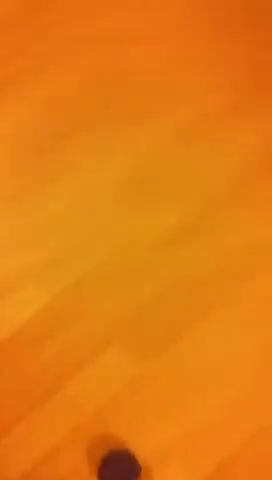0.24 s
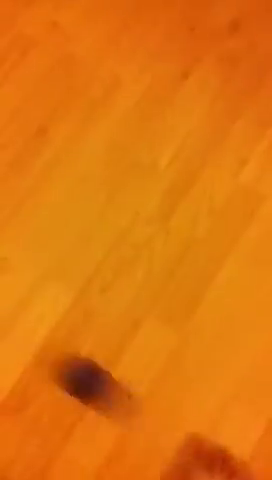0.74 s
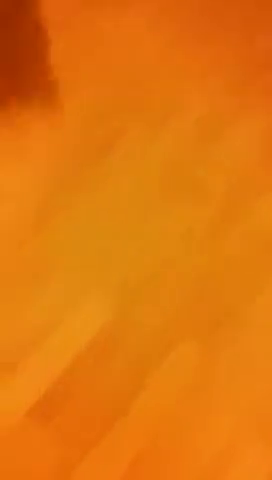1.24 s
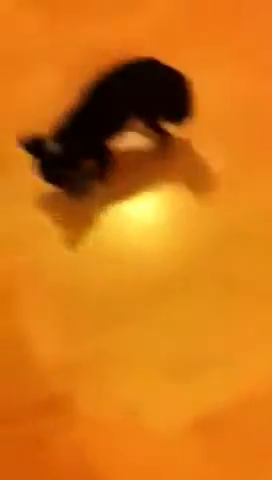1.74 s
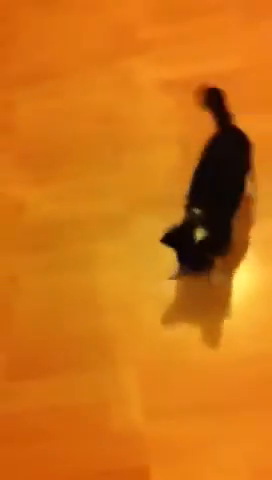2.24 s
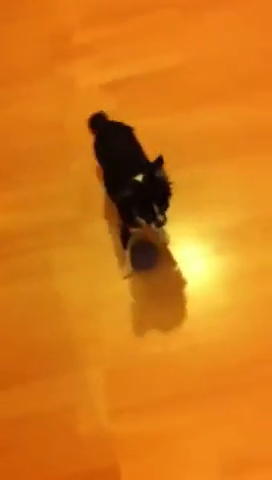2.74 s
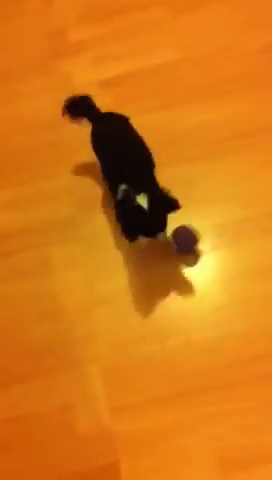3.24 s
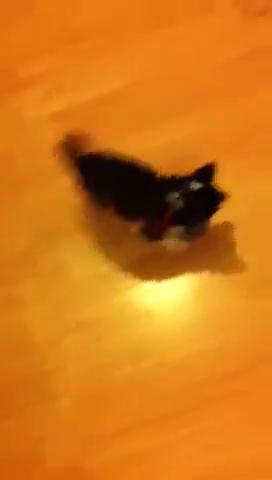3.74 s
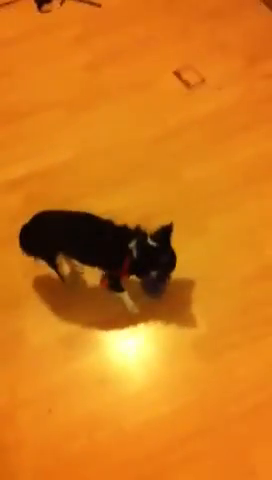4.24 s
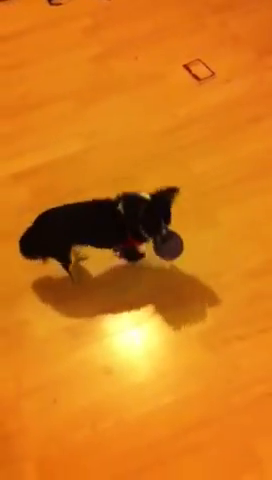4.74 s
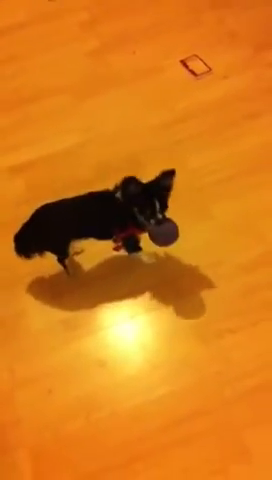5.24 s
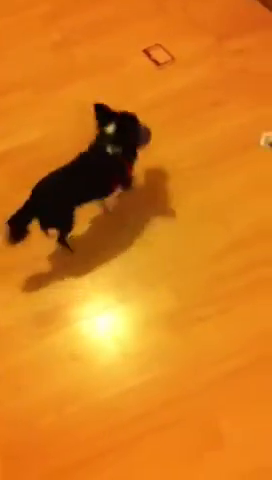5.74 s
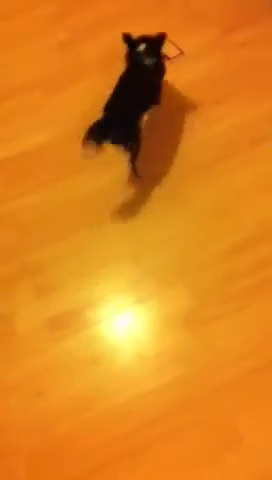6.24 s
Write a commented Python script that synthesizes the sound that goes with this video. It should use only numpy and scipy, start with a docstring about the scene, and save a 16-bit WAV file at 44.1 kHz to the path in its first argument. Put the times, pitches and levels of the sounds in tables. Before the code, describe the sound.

Cloth zips, a toy chirps briefly, then claws clatter on floorboards with two loud squeaky bites and tiny tag tinkles in a room.

```python
"""A small dog with a squeaky rubber ball on a wooden floor; hum, hiss and a faint burble lie behind it all.
First a trouser leg zips, rib against rib, ahead of a light kick; the boards thump and the reed squeaks briefly.
From about 1 s claws tick and skid, blows ring the boards and the collar tag tinkles; bites at 1.8 s and 3.6 s
make the reed squeak with the jaw's pressure. Sparse claws follow, then one dry click close to the microphone,
more light steps and two last tinkles. Toy, dog and leg are heard in a briefly ringing room."""
import sys
import numpy as np
from scipy import signal
from scipy.fft import rfft, irfft, next_fast_len
from scipy.io import wavfile

SR = 44100
rng = np.random.default_rng(int(sys.argv[2]) if len(sys.argv) > 2 else 0)


def master_out(mix):
    """Clip the mix to full scale and print it as 16-bit PCM to the path in sys.argv[1]."""
    frames = np.transpose(np.atleast_2d(mix))
    ceiling = np.clip(frames, -1, 1)
    pcm = np.round(ceiling * 32767).astype(np.int16)
    wavfile.write(sys.argv[1], SR, pcm)


N = 286958
TIME = np.arange(N) / SR

# Room: decay time per band: pitch_hz, t60_s
ROOM_DECAY = [(200, 0.81), (800, 0.29), (2000, 0.41), (6000, 0.36), (10000, 0.34), (15000, 0.28)]
# Near reflections from floor, walls and ceiling: delay_s, gain (before each source's own share)
REFLECTIONS = [(.0023, 0.082), (.0061, 0.12), (0.0094, .35), (0.0144, 0.05)]
# Background hiss, relative colour: pitch_hz, level_db
HISS_COLOUR = [(25, -50), (45, -2.5), (70, -10.5), (150, 15), (300, 8), (600, -0.5), (1300, -4),
               (2500, -6.5), (5000, -7.5), (10000, -11.5), (15500, -12)]
# Steady motor lines of the appliance: pitch_hz, level_db (rms, about which it wavers)
MOTOR_LINES = [(150, -63.5), (200, -64.5)]
# Low resonances of the appliance's rumble: pitch_hz, width_hz, level_db (rms)
RUMBLE_BANDS = [(107.1, 4.3, -75.5), (150.2, 7.4, -75), (166.7, 8.4, -65), (241.8, 36, -66.5),
                (289.6, 40, -74.5), (371, 62, -77.5), (495.7, 42, -80)]
# Click close to the microphone, relative colour: pitch_hz, level_db
CLICK_COLOUR = [(300, -29), (2500, -24), (3800, -1), (7000, -14), (10000, -18), (15500, -15)]
# Leg movement: time_s, ribs_per_s, level_db
LEG_SWISH = [(0.081, 740, -90), (0.15, 670, -80), (0.22, 610, -67.5), (0.31, 680, -59), (0.37, 816, -68.5),
             (0.432, 820, -61), (0.50, 760, -68.5), (0.57, 1740, -76)]
# What the cloth gives off, relative colour: pitch_hz, level_db
CLOTH_COLOUR = [(500, -20), (820, 4.5), (1350, 5.5), (2100, 4), (2700, -6), (4000, -17), (7000, 4)]
# Jolts of the collar tag: start_s, level_db
TAG_JOLTS = [(1.55, -47.5), (1.631, -41), (6.069, -47), (6.449, -41.5)]
# Ringing modes of the tag: pitch_hz, level_db (relative to the touch), t60_s
TAG_MODES = [(6650, -47, 0.27), (8170, -23.5, 0.5), (10300, -10.5, 0.16), (14690, -17, .08),
             (14740, 9, 0.068)]
# Blows of paws and ball on the boards: start_s, level_db, knock_hz
FLOOR_BLOWS = [(0.495, -43.5, 837), (0.712, -41, 870), (0.863, -45, 810), (1.230, -42.5, 452),
               (1.335, -46, 507), (1.488, -33.5, 450), (1.585, -32, 438), (1.658, -46, 480),
               (2.293, -39, 700), (2.308, -38, 760), (2.614, -60, 690), (3.333, -46.5, 437),
               (3.529, -40, 636), (3.667, -45, 690)]
# Ringing modes of the boards: pitch_hz, level_db (relative to the blow), t60_s
BOARD_MODES = [(245, 4.5, 0.14), (360, -8, 0.046), (422, -6, 0.042), (506, 2, 0.013), (566, -7, 0.074),
               (738, -3.5, 0.021), (887, -3.5, 0.028), (1022, -17, 0.083), (1555, 8.5, 0.0084)]
# Single claws on the boards: start_s, level_db, treble_tilt_db_per_octave, scrape_share
CLAW_TICKS = [(1.065, -34.5, 2, 0), (1.228, -25, 4.5, 0), (1.309, -34, 12, .1), (1.344, -28.5, 1.5, 0),
              (1.489, -26, 2.5, 0), (1.525, -29, 3.5, 0.12), (1.659, -31, 1.5, 0.63), (1.726, -44, 7, 0.86),
              (2.291, -36, 1.5, 0.45), (2.311, -38.5, 1.5, 0.65), (2.443, -42, 2, 0.28),
              (2.617, -40.5, 2, 0.63), (2.639, -39, 3, 0.53), (3.328, -39.5, 2, 0.72),
              (3.531, -46.5, -1, .95), (3.939, -50.5, 3, 0.86), (4.928, -52.5, 0, 0.62),
              (5.693, -56.5, 2.5, 0.76), (6.410, -49, 0, 0.13)]
# Colour common to all claws, relative, before the tilt: pitch_hz, level_db
CLAW_SPECTRUM = [(80, -78), (500, 14.5), (1000, -3.5), (1700, -7), (2800, -10), (4300, 1), (7000, -3),
                 (10000, -4), (15500, -9.5)]
# Stretches of trotting with light steps: start_s, end_s, level_db (middle of the spread)
TROT_SPANS = [(0.874, 1.2, -56.5), (1.429, 1.72, -49), (5.833, 6.5, -59.5)]
# What the squeaker's tube lets out: pitch_hz, level_db (relative)
TUBE_RESPONSE = [(1100, -1.5), (2250, -11), (3400, -9.5), (4500, -8.5), (5600, -4), (6100, -3), (6650, 1.5),
                 (7250, -4), (7900, -8), (9000, -12), (11200, -20.5), (13500, -31.5), (16000, -37)]
# Squeezes of the ball, a light kick then two bites: start_s, length_s, release_s, held_pitch_hz,
# snap_s (peak of the first snap after the start), snap_rise_hz, push_s (peak of the second push
# after the start), push_width_s, held_level_db, brightness_db, held_roughness
BALL_SQUEEZES = [(0.703, 0.057, 0.051, 1039, 0.007, 54.5, 0.006, 0.0091, -48.5, -8, 1.08),
                 (1.753, 0.34, 0.046, 1107, .03, 106.6, .25, 0.092, -30, 0, 0.14),
                 (3.611, .25, .066, 1082, .023, 131.7, .172, 0.0267, -29.5, -4, 0)]

HISS_RMS_DB = -64
BLIPS_PER_S, BLIP_T60_S, BLIP_SPREAD_DB = 6.9, 0.038, -0.5
CLICK_START_S, CLICK_LEVEL_DB = 5.779, -38
TAG_SWING_S, TAG_SWING_LOSS_DB = 0.035, 10   # mean wait and loss from touch to touch
TAG_CLICK_DB, TAG_CLICK_DECAY_S, TAG_CLICK_LOW_CUT_HZ = -3, 0.0063, 6000
STEPS_PER_S, STEP_SPREAD_DB, STEP_TILT_DB_PER_OCTAVE, STEP_SCRAPE_SHARE = 8, 6.5, 0.5, 0.4
SNAP_WIDTH_S, PUSH_RISE_HZ, RELEASE_DROOP_HZ = 0.037, 29.04, 55
EDGE_S, RELEASE_FADE_DB, RELEASE_BRIGHT_DB = 0.004, 14.5, 9
LOUDER_DB_PER_HZ, BRIGHTER_DB_PER_HZ = 0.04, 0.0057   # per Hz of pitch rise
SAG_S, SAG_WIDTH_S = 0.054, 0.078   # the reed flaps raggedly while the first snap sags
SAG_ROUGHNESS, RELEASE_ROUGHNESS = 0.48, 0.81   # added to the held roughness
WEAK_BLOW_DB = -53
TOP_CUTOFF_HZ = 16000


def from_db(db):
    """Turn decibels into a gain."""
    return 10 ** (np.asarray(db) / 20)


def rms_one(x):
    """Scale a sound to an rms of 1."""
    return x / np.sqrt(np.mean(x ** 2) + 1e-20)


def at_hz(points, hz):
    """Read a table on a log-frequency axis."""
    freqs, values = np.transpose(points)
    return np.interp(np.log(np.maximum(hz, 1)), np.log(freqs), values)


def add(out, start_s, sound):
    """Mix a short sound in at its start."""
    at = int(start_s * SR)
    out[at:at + len(sound)] += sound[:N - at]


def drift(points_per_s):
    """Straight lines between random points of spread 1: an unsteady hand."""
    points = rng.standard_normal(N // 8)
    return np.interp(TIME * points_per_s, np.arange(len(points)), points)


def swell(t, centre_s, width_s):
    """A smooth rise and fall of height 1."""
    return np.exp(-((t - centre_s) / width_s) ** 2)


def filtered(x, hz, kind):
    """Second-order Butterworth filter: "low", "high" or "band"."""
    return signal.sosfilt(signal.butter(2, hz, kind, fs=SR, output="sos"), x)


def coloured(x, spectrum):
    """Give a noise the spectrum of a table."""
    size = next_fast_len(len(x))
    gains = from_db(at_hz(spectrum, np.fft.rfftfreq(size, 1 / SR)))
    return irfft(rfft(x, size) * gains, size)[:len(x)]


def ring(x, hz, t60):
    """A two-pole resonance: a unit click sets a sine of height 1 ringing, which dies by 60 dB in t60."""
    radius = np.exp(-np.log(1000) / (t60 * SR))
    turn = 2 * np.pi * hz / SR
    return signal.lfilter([0, np.sin(turn)], [1, -2 * radius * np.cos(turn), radius ** 2], x + 1e-18)


def room_tail(build_s):
    """Diffuse echoes that build up and then die band by band; unit energy."""
    t = TIME[:SR * 3 // 4]
    white = rfft(rng.standard_normal(len(t)))
    hz = np.fft.rfftfreq(len(t), 1 / SR)
    edges = np.geomspace(60, SR / 2, 12)
    tail = np.zeros(len(t))
    for low, high in zip(edges, edges[1:]):
        band = irfft(white * (hz >= low) * (hz < high), len(t))
        t60 = at_hz(ROOM_DECAY, np.sqrt(low * high))
        tail += band * np.exp(-np.log(1000) * t / t60)
    tail *= 1 - np.exp(-t / build_s)
    return tail / np.linalg.norm(tail)


def room(x, wet_db, early):
    """Direct sound, a few near reflections and the tail, together of unit energy."""
    response = from_db(wet_db) * room_tail(build_s=0.0009)
    response[0] += 1
    for delay_s, gain in REFLECTIONS:
        response[int(delay_s * SR)] += early * gain
    return signal.fftconvolve(x, response / np.linalg.norm(response))[:N]


def hiss():
    """Steady coloured noise behind everything."""
    return from_db(HISS_RMS_DB) * rms_one(coloured(rng.standard_normal(N), HISS_COLOUR))


def appliance(waver_db):
    """An appliance hums: wavering motor lines and a rumble that gathers in low resonances."""
    out = np.zeros(N)
    for hz, level_db in MOTOR_LINES:
        height = np.sqrt(2) * from_db(level_db + waver_db * drift(4.2))
        out += height * np.sin(2 * np.pi * (hz * TIME + rng.random()))
    for hz, width_hz, level_db in RUMBLE_BANDS:
        noise = rng.standard_normal(N + SR)
        band = filtered(noise, [hz - width_hz / 2, hz + width_hz / 2], "band")
        out += from_db(level_db) * rms_one(band[SR:])   # skip the filter's first second
    return out


def burble(low_hz, high_hz, level_db):
    """Soft, hollow blips of changing pitch: uneven clicks excite resonances in random proportions."""
    sizes = np.zeros(N)
    for k, (late, strength) in enumerate(rng.standard_normal((100, 2))):
        at = int(abs(k + 0.25 * late) / BLIPS_PER_S * SR)
        sizes[at:at + 1] = from_db(BLIP_SPREAD_DB * strength)
    blips = np.zeros(N)
    for hz in np.geomspace(low_hz, high_hz, 9):
        blips += ring(sizes * rng.standard_normal(N), hz, BLIP_T60_S)
    blips = filtered(blips, [low_hz, high_hz], "band")
    return from_db(level_db) * rms_one(room(blips, wet_db=7.5, early=1.0))


def near_click(decay_s):
    """One small dry click close to the microphone: a burst of noise that dies at once."""
    out, t = np.zeros(N), TIME[:SR // 50]
    burst = rms_one(coloured(rng.standard_normal(len(t)), CLICK_COLOUR))
    add(out, CLICK_START_S, from_db(CLICK_LEVEL_DB) * burst * np.exp(-t / decay_s))
    return out


def swish(slip):
    """Ribbed cloth rubs on cloth: an unsteady zip whose pitch follows the speed of the leg."""
    time_s, ribs_per_s, level_db = np.transpose(LEG_SWISH)
    rate = np.interp(TIME, time_s, ribs_per_s)
    phase = 2 * np.pi * np.cumsum(rate * (1 + slip * drift(900))) / SR
    zipping = np.zeros(N)
    for order in range(1, 8):
        gain = from_db(at_hz(CLOTH_COLOUR, order * rate))
        zipping += gain * drift(129.7) * np.sin(order * phase)
    moving = (TIME > time_s[0]) * (TIME < time_s[-1])
    return from_db(np.interp(TIME, time_s, level_db)) * moving * zipping


def collar_tag():
    """Each jolt makes a small metal disc touch, swing back and touch twice more; it clicks and rings very high."""
    touches = np.zeros(N)
    for start_s, level_db in TAG_JOLTS:
        for k, uneven in enumerate(rng.uniform(0.8, 1.2, 3)):
            at = int((start_s + k * TAG_SWING_S * uneven) * SR)
            touches[at:at + 1] = from_db(level_db - k * TAG_SWING_LOSS_DB)
    t = TIME[:SR // 20]
    burst = rng.standard_normal(len(t)) * np.exp(-t / TAG_CLICK_DECAY_S)
    click = filtered(burst, TAG_CLICK_LOW_CUT_HZ, "high")
    rings = sum(from_db(level_db) * ring(touches, hz, t60) for hz, level_db, t60 in TAG_MODES)
    return rings + from_db(TAG_CLICK_DB) * signal.fftconvolve(touches, click)[:N]


def thumps(focus_db, contact_hz):
    """Soft blows of paws and ball ring the boards; each wakes mostly the modes near its own pitch."""
    start_s, blow_db, knock_hz = np.transpose(FLOOR_BLOWS)
    out = np.zeros(N)
    for hz, mode_db, t60 in BOARD_MODES:
        distance_loss_db = focus_db * np.log2(hz / knock_hz) ** 2
        strength_db = blow_db + mode_db - distance_loss_db + rng.normal(0, 3.0, len(start_s))
        blows = np.zeros(N)
        blows[(start_s * SR).astype(int)] = from_db(strength_db) * rng.choice([-1, 1], len(start_s))
        out += ring(blows, hz, t60)
    return filtered(out, contact_hz, "low")   # a soft contact gives little treble


def light_steps():
    """Faint, unevenly timed claw ticks while the dog trots: rows like those of CLAW_TICKS."""
    steps = []
    for start_s, end_s, level_db in TROT_SPANS:
        chance = rng.standard_normal((20, 2))
        for step_s, (late, hard) in zip(np.arange(start_s, end_s, 1 / STEPS_PER_S), chance):
            at_s = step_s + 0.18 * late / STEPS_PER_S
            step_db = level_db + STEP_SPREAD_DB * hard
            if at_s < TIME[-1]:
                steps.append((at_s, step_db, STEP_TILT_DB_PER_OCTAVE, STEP_SCRAPE_SHARE))
    return steps


def claws(tick_s, scrape_s, scrape_db, catch_db):
    """Each claw gives a hard tick and skids on in a short grainy scrape that catches unevenly."""
    out, t = np.zeros(N), TIME[:SR // 10]
    for start_s, level_db, tilt_db, scrape_share in CLAW_TICKS + light_steps():
        colour = [(hz, db + tilt_db * np.log2(hz)) for hz, db in CLAW_SPECTRUM]
        grit = rng.standard_normal(len(t)) * rng.exponential(1, len(t))
        catches = from_db(catch_db * drift(400)[:len(t)])
        tick = np.exp(-t / tick_s)
        scrape = scrape_share * from_db(scrape_db) * catches * np.exp(-t / scrape_s)
        add(out, start_s, from_db(level_db) * rms_one(coloured(grit, colour)) * (tick + scrape))
    return filtered(out, 250, "high")


def squeak(squeeze, jitter, flutter_db, air_db):
    """The reed chops escaping air into a buzz; pitch, level and brightness follow snap, sag, push and release."""
    (start_s, length_s, release_s, held_hz, snap_s, snap_hz, push_s, push_width_s,
     held_db, colour_db, held_roughness) = squeeze
    t = TIME[:int(length_s * SR)]
    count = len(t)
    rise_hz = snap_hz * swell(t, snap_s, SNAP_WIDTH_S) + PUSH_RISE_HZ * swell(t, push_s, push_width_s)
    release = np.clip(1 - (length_s - t) / release_s, 0, 1)   # 0 while held, 1 when the air has run out
    rough = held_roughness + SAG_ROUGHNESS * swell(t, SAG_S, SAG_WIDTH_S)
    rough = rough + RELEASE_ROUGHNESS * np.sqrt(release)
    level_db = held_db + LOUDER_DB_PER_HZ * rise_hz - RELEASE_FADE_DB * release
    bright_db = colour_db + BRIGHTER_DB_PER_HZ * rise_hz + RELEASE_BRIGHT_DB * release

    pitch = held_hz + rise_hz - RELEASE_DROOP_HZ * release
    pitch = pitch * (1 + jitter * rough * drift(700)[:count])
    phase = 2 * np.pi * np.cumsum(pitch) / SR
    orders = np.arange(1, 15)[:, None]
    # the tube favours some overtones
    gains = from_db(at_hz(TUBE_RESPONSE, orders * pitch) + bright_db * (orders > 1))
    # a feeble puff barely closes the reed: few overtones
    gains = gains / (1 + (orders * from_db(WEAK_BLOW_DB - level_db) / 2) ** 4)
    buzz = np.sum(gains * np.sin(orders * phase), axis=0)

    # air rushes out while the reed is open
    rush = coloured(rng.standard_normal(count), TUBE_RESPONSE) * (1 + np.cos(phase))
    air = filtered(rms_one(rush), 5000, "high")
    edges = np.clip(np.minimum(t, length_s - t) / EDGE_S, 0, 1)
    loudness = from_db(level_db + flutter_db * rough * drift(150)[:count])
    out = np.zeros(N)
    add(out, start_s, edges * loudness * (buzz + from_db(air_db) * rough * air))
    return out


def scene():
    """Leg, dog and toy sound in the same room, over a steady background."""
    background = hiss() + appliance(waver_db=2.0) + burble(low_hz=752, high_hz=1120, level_db=-72.5)
    click = near_click(decay_s=0.00088)
    cloth = from_db(1.5) * room(swish(slip=0.06), wet_db=-1, early=1.0)
    tag = from_db(2.5) * room(collar_tag(), wet_db=0, early=0.22)
    knocks = from_db(3.0) * room(thumps(focus_db=20.5, contact_hz=1830), wet_db=0.0, early=0.46)
    knocks = filtered(knocks, 170, "high")   # light blows move little air in the bass
    ticks = claws(tick_s=0.0025, scrape_s=0.011, scrape_db=1, catch_db=8.0)
    ticks = from_db(-1.5) * room(ticks, wet_db=2.5, early=1.0)
    toy = sum(squeak(squeeze, jitter=0.013, flutter_db=4.0, air_db=-17.5) for squeeze in BALL_SQUEEZES)
    toy = from_db(-0.1) * room(toy, wet_db=-0.5, early=0.37)
    return (background + click + cloth + tag + knocks + ticks + toy)[None]


def record(dry):
    """A steep elliptic low-pass cuts off the top."""
    return signal.sosfilt(signal.ellip(10, 0.1, 70, TOP_CUTOFF_HZ, fs=SR, output="sos"), dry)


dry = scene()
out = record(dry)
master_out(out)
```